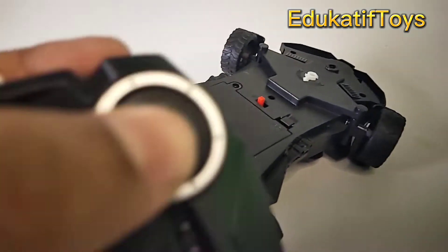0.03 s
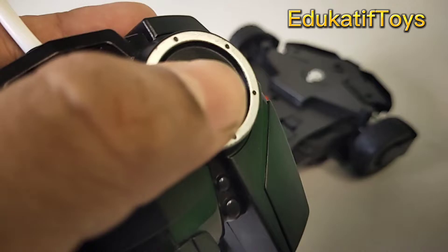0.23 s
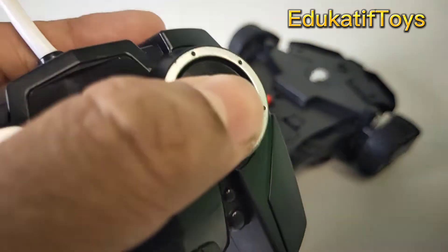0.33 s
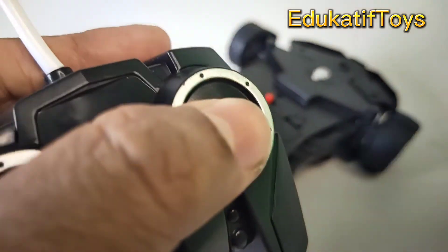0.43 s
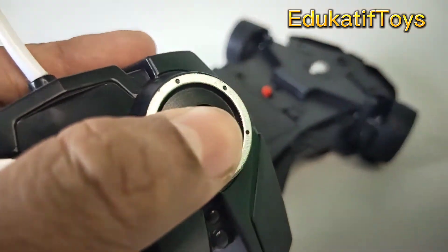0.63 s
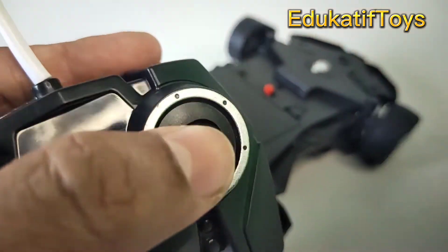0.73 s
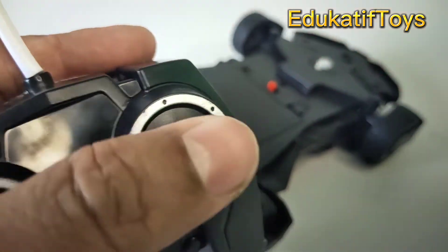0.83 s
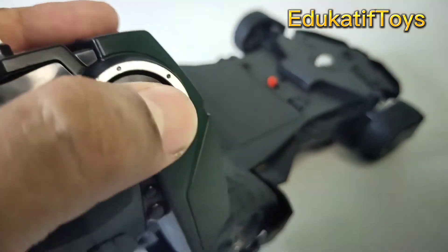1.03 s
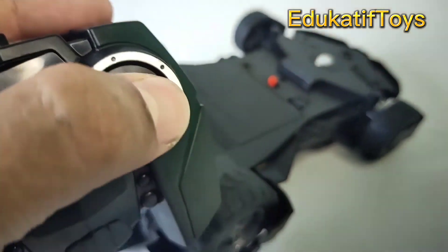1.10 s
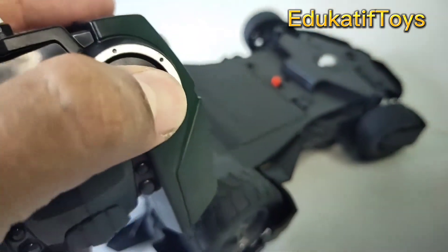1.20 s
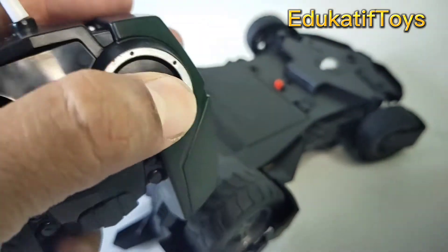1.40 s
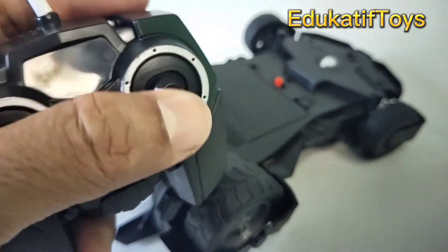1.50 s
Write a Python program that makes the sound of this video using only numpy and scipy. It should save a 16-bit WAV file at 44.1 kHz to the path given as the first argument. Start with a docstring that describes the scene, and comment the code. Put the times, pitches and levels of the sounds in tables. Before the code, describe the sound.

A toy remote's plastic stick clicks sharply twice under a thumb, with faint scrapes around the clicks and soft hollow knocks at the start and end. It is heard close up in a small, quiet room.

```python
"""Thumb on a toy remote

A thumb works the small stick of a plastic toy remote, close up. The stick knocks on the hollow
shell, snaps its switch over twice and scrapes in its socket in between. A small hard room answers
each click, over a low rumble that swells with the handling."""
import sys
import numpy as np
from scipy import signal
from scipy.fft import rfft, irfft, next_fast_len
from scipy.io import wavfile
from scipy.ndimage import map_coordinates

SR = 44100
rng = np.random.default_rng(int(sys.argv[2]) if len(sys.argv) > 2 else 0)


def bounce(signal):
    """Save signal as a 16-bit WAV file at the path given by the first command-line argument."""
    frames = np.transpose(np.atleast_2d(signal))
    limited = np.clip(frames, -1, 1)
    pcm = np.round(limited * 32767).astype(np.int16)
    wavfile.write(sys.argv[1], SR, pcm)


N = 68355


def amp(db):
    """Decibels to gain."""
    return 10 ** (np.asarray(db) / 20)


def unit(x):
    """Scale to rms 1."""
    return x / np.sqrt(np.mean(x ** 2) + 1e-20)


def decay(t, t60):
    """A fade that falls 60 dB in t60 seconds."""
    return amp(-60 * t / t60)


def curve(points):
    """Join (Hz, value) points into a function of frequency, on a log axis."""
    freqs, values = np.transpose(points)
    return lambda hz: np.interp(np.log(hz + 1), np.log(freqs + 1), values)


def eq(x, gain_db):
    """Filter x by a function from Hz to dB."""
    n = x.shape[-1]
    padded = next_fast_len(n + SR // 10)
    hz = np.fft.rfftfreq(padded, 1 / SR)
    return irfft(rfft(x, padded) * amp(gain_db(hz)), padded)[..., :n]


def widen(pair, width):
    """Spread two unrelated signals as mid and side; width 0 is mono."""
    mid, side = pair[0], width * pair[1]
    return np.array([mid + side, mid - side]) / np.sqrt(1 + width ** 2)


def noise(spectrum, size, width):
    """Coloured stereo noise of rms 1."""
    return unit(widen(eq(rng.standard_normal((2, size)), curve(spectrum)), width))


def place(track, start_s, sound):
    """Mix a sound into the track."""
    start = round(start_s * SR)
    sound = sound[:, :N - start]
    track[:, start:start + sound.shape[1]] += sound


# Tone of the still air. Each row: frequency in Hz, level in dB.
AIR_SPECTRUM = [(30, -7), (150, -29), (500, -2.5), (900, -14), (2000, -11), (2850, -12), (3600, -22.5),
                (7000, -28.5), (15000, -36)]

def room_air():
    """The air of the room: a faint, wide, steady bed."""
    return amp(-74) * noise(AIR_SPECTRUM, N, width=0.89)


# Fader ride of the handling. Each row: time in seconds, level in dB.
HANDLING_SWELL = [(0.0, -50), (0.09, -66), (0.254, -47), (0.43, -54.5), (0.452, -48.5), (0.686, -58),
                  (0.764, -46), (0.79, -51.5), (0.928, -50.5), (0.948, -54.5), (0.992, -69), (1.048, -51.5),
                  (1.148, -57), (1.19, -48.5), (1.364, -61.5), (1.424, -60), (1.48, -69), (1.55, -54)]
# Tone of the rumble. Each row: frequency in Hz, level in dB.
RUMBLE_SPECTRUM = [(20, -55), (45, -24.5), (60, -18.5), (75, 0), (100, -4), (130, -1), (153, -3.5),
                   (176, -0.5), (215, -10), (300, -10), (500, -23.5), (1000, -37), (3000, -69)]
# Low hum inside the rumble. Each row: pitch in Hz, relative level in dB.
HUM_TONES = [(129.5, -4.5), (176, -9)]

def handling_rumble(drift_hz=7.7, drift_s=0.07):
    """Low noise and a wavering hum swell with the handling, the hum a little less."""
    t = np.arange(N) / SR
    swell_db = np.interp(t, *np.transpose(HANDLING_SWELL))
    hum_db = swell_db.mean() + 0.92 * (swell_db - swell_db.mean())
    hum = 0
    for hz, db in HUM_TONES:
        drift = map_coordinates(rng.standard_normal(64), [t / drift_s], mode="mirror")
        phase = 2 * np.pi * np.cumsum(hz + drift_hz * drift) / SR
        hum += np.sqrt(2) * amp(db + hum_db) * np.sin(phase)
    return hum + amp(swell_db - 3.5) * noise(RUMBLE_SPECTRUM, N, width=0.16)


# Decay of the room. Each row: frequency in Hz, time to fall 60 dB in seconds.
REVERB_T60 = [(150, 0.98), (800, 0.24), (3000, 0.25), (8000, 0.31), (15000, 0.34)]
# Tone of the reverb. Each row: frequency in Hz, gain in dB.
REVERB_EQ = [(100, -5), (500, 4.5), (1500, 1.5), (2700, 3.5), (4000, -2.5), (6000, -2.5), (9000, -3),
             (15000, -3)]

def reverb(send, return_db=-5, near_db=-7, wall_delay_s=0.0081):
    """A small hard room answers: faint near surfaces first, then the walls."""
    hz, t, bands = signal.stft(rng.standard_normal((2, SR // 2)), SR, nperseg=256)
    bands = bands * decay(t, curve(REVERB_T60)(hz)[:, None])
    tail = signal.istft(bands, SR, nperseg=256)[1]
    age = np.arange(tail.shape[1]) / SR
    tail = widen(tail, 0.49) * amp(near_db / (1 + (age / wall_delay_s) ** 20))
    tail = eq(tail / np.linalg.norm(tail[0]), curve(REVERB_EQ))
    return amp(return_db) * signal.fftconvolve(send, tail, axes=1)


# Stereo lean of the direct sound. Each row: frequency in Hz, left over right in dB.
DIRECT_BALANCE = [(500, -4.5), (1200, -1.5), (2100, 1), (3200, 5), (6000, 4.5), (9000, -6.5), (14000, -2.5)]

def in_room(direct, send):
    """The direct sound at left and right, plus the room's answer to the send."""
    mix = reverb(send)
    balance_db = curve(DIRECT_BALANCE)
    mix[:, :direct.shape[1]] += eq(direct, lambda hz: balance_db(hz) * np.array([[0.5], [-0.5]]))
    return mix


def shelves(body_db, treble_db, body_hz=1900, treble_hz=6500):
    """The EQ curve of one contact: a low shelf for body, a high shelf for treble."""
    return lambda hz: (body_db / (1 + (hz / body_hz) ** 4)
                       + treble_db * (1 - 1 / (1 + (hz / treble_hz) ** 6)))


# Tone of rubbing plastic. Each row: frequency in Hz, level in dB.
SCRAPE_SPECTRUM = [(100, -16), (300, -8), (600, -5), (880, 2.5), (1100, -6), (1500, 2.5), (2200, 1),
                   (3500, 0), (5500, -8), (7000, -17), (9500, -13.5), (11500, -26.5), (15000, -33.5)]
# Scrape cues. Each row: start in seconds, length before the fade in seconds, level in dB,
# body in dB, treble in dB.
SCRAPE_CUES = [(0.187, 0.0091, -47.5, 6.5, -3), (.199, 0.015, -48, 6, -2), (0.2238, 0.0016, -47, 15, 30),
               (0.227, 0.023, -43, -3.5, 2), (0.2365, 0.0027, -31, 5.5, -13.5),
               (0.248, 0.063, -47, -9, -0.5), (0.275, 0.0041, -53, -15, 23),
               (0.291, 0.014, -51.5, 4.5, -13), (0.423, 0.015, -42.5, -2.5, -6),
               (0.442, 0.012, -44, 4.5, 0), (0.46, 0.035, -56, 4, 3.5), (0.705, 0.0023, -43.5, -14, -3),
               (0.7178, 0.016, -43.5, -2, -1.5), (0.741, 0.035, -55, 13, 4),
               (0.771, 0.01, -33.5, -4.5, 4.5), (0.781, 0.02, -38.5, 2.5, -7),
               (0.796, 0.068, -50.5, -6.5, 6), (0.841, 0.0031, -41.5, 2.5, -1), (0.8696, 0.0037, -36, 0, 5),
               (0.9277, 0.0027, -34, -6.5, -3), (0.936, .006, -45, -26, -4), (1.143, 0.0057, -46, -5, -5.5),
               (1.148, 0.0063, -39, -0.5, -0.5), (1.159, 0.039, -54.5, 4.5, 6),
               (1.194, 0.0093, -38.5, 3.5, -8), (1.212, 0.016, -51.5, 3, 1), (1.501, 0.014, -40, -2, -4.5),
               (1.535, 0.0082, -47, 0, 12), (1.545, .007, -37, -11, -0.5)]

def socket_scrapes(slips_per_s=1200, slip_spread_db=3, rise_s=0.0034, release_t60_s=0.025):
    """The stick slips in its socket, plastic on plastic: tiny catches over a smooth rub."""
    track = np.zeros((2, N))
    t = np.arange(SR // 10) / SR
    for start_s, length_s, db, body_db, treble_db in SCRAPE_CUES:
        catches = rng.random(len(t)) < slips_per_s / SR
        strength = amp(slip_spread_db * rng.standard_normal(len(t)))
        slips = catches * strength * rng.choice([-1, 1], (2, len(t)))
        rub = 0.6 * rng.standard_normal(slips.shape)
        friction = widen(unit(slips) + rub, width=0.82)
        grain = unit(eq(friction, curve(SCRAPE_SPECTRUM)))
        stroke = np.minimum(t / rise_s, 1) * decay(np.maximum(t - length_s, 0), release_t60_s)
        scrape = amp(db) * stroke * eq(grain, shelves(body_db, treble_db))
        place(track, start_s, in_room(scrape, scrape))
    return track


def ring_modes(t, modes, colour, scatter_db=1.6, scatter_rad=1, stereo_rad=0.83):
    """Struck plastic rings in fast-dying modes whose level and phase vary from blow to blow."""
    hz, mode_db, t60 = np.transpose(modes)[:, :, None]
    stereo_phase = np.array([1, -1])[:, None, None] * stereo_rad * rng.choice([-1, 1], hz.shape)
    alternating_phase = np.pi * np.arange(len(hz))[:, None]
    phase = alternating_phase + scatter_rad * rng.standard_normal(hz.shape) + stereo_phase
    gain = amp(mode_db + colour(hz) + scatter_db * rng.standard_normal(hz.shape))
    return (gain * decay(t, t60) * np.sin(2 * np.pi * hz * t + phase)).sum(axis=1)


# Tone of a click's noisy crack. Each row: frequency in Hz, level in dB.
CRACK_SPECTRUM = [(30, -41), (150, -13), (400, -15), (800, -10.5), (1300, -1), (1700, -9), (2600, 5),
                  (3500, 1), (5000, -4.5), (7000, -18), (8500, -14.5), (11000, -25), (15000, -32)]
# Ring thrown sideways into the room. Each row: frequency in Hz, send gain in dB.
RING_SEND_EQ = [(400, 0.5), (1200, -2.5), (2100, -5), (2600, 9.5), (3500, -9.5), (6000, -7), (9000, -3),
                (15000, -3.5)]
ATTACK_S, CRACK_T60_S, LEAD_IN_S = 0.0011, 0.016, 0.0044
CRACK_DB, CRACK_SEND_DB, LEAD_IN_DB = -8, -3, -19

def click(modes, start_s, db, body_db, treble_db, pan_db):
    """One blow: a faint noise swells just before the crack and short ring."""
    t = np.arange(SR // 20) / SR
    colour = shelves(body_db, treble_db)

    def grit():
        return eq(noise(CRACK_SPECTRUM, len(t), width=1), colour)

    attack = 1 - np.exp(-(t / ATTACK_S) ** 2)
    ring = attack * ring_modes(t, modes, colour)
    burst = attack * decay(t, CRACK_T60_S)
    pan = amp([[pan_db / 2], [-pan_db / 2]])
    direct = (ring + amp(CRACK_DB) * burst * grit()) * pan
    send = eq(ring, curve(RING_SEND_EQ)) + amp(CRACK_SEND_DB) * burst * grit()
    lead_in = (t / LEAD_IN_S) ** 2 * (t < LEAD_IN_S + ATTACK_S / 2)
    track = np.zeros((2, N))
    place(track, start_s, in_room(direct, send))
    place(track, start_s - LEAD_IN_S, amp(CRACK_DB + LEAD_IN_DB) * lead_in * grit())
    return amp(db) * track


# Ring of the shell. Each row: frequency in Hz, level in dB, time to fall 60 dB in seconds.
SHELL_MODES = [(420, -23, .016), (693, -15.5, 0.02), (1115, -3, 0.013), (1350, -11, 0.018),
               (2065, -10.5, 0.024), (2550, -13, 0.0063), (3544, -5, .013), (3850, -13.5, 0.018),
               (4520, -21, 0.021), (6100, -18.5, 0.0079), (8000, -29, .012)]
# Knock cues. Each row: start in seconds, level in dB, body in dB, treble in dB, leftward pan in dB.
KNOCK_CUES = [(.1080, -25, 6, -1, -0.5), (0.6856, -31, 9.5, 0, 0.5), (1.4855, -22, -0.5, 5, 0.5),
              (1.4921, -24, -18, 1.5, 6)]

def shell_knocks():
    """The stick bumps the hollow shell, which gives a dull knock."""
    return sum(click(SHELL_MODES, *cue) for cue in KNOCK_CUES)


# Ring of the switch. Each row: frequency in Hz, level going in and level coming out in dB,
# time to fall 60 dB in seconds.
SWITCH_MODES = [(1050, -18, -15, .014), (1370, -13.5, -17, .016), (2088, -3.5, -38, .016),
                (2530, -14.5, -6.5, 0.01), (3138, 1, -6, 0.0089), (3560, -3.5, 1.5, 0.0096),
                (4110, -4.5, -1, 0.0096), (4800, -14.5, -14, .011), (6050, -5, -23, 0.0078),
                (8285, -20, -17.5, .009), (9110, -19, -20.5, 0.012), (11220, -31, -28.5, 0.014),
                (13400, -24, -16.5, .008), (14770, -27, -24, .008)]
# Snap cues. Each row: start in seconds, level in dB, body in dB, treble in dB, leftward pan in dB.
SNAP_CUES = [(0.3295, -6.5, -4, 3.5, 5.5), (0.9927, -8, -5.5, 1.5, -2.5)]

def switch_snaps():
    """The switch snaps in, then back out; each direction strikes its modes differently."""
    hz, in_db, out_db, t60 = np.transpose(SWITCH_MODES)
    snap_in = click(np.transpose([hz, in_db, t60]), *SNAP_CUES[0])
    snap_out = click(np.transpose([hz, out_db, t60]), *SNAP_CUES[1])
    return snap_in + snap_out


def scene(bass_mono_hz=350):
    """The remote over rumble and air; its bass is centred, as long waves reach both sides alike."""
    left, right = shell_knocks() + switch_snaps() + socket_scrapes()
    mid = (left + right) / 2
    side = eq((left - right) / 2, lambda hz: -10 * np.log10(1 + (bass_mono_hz / (hz + 1)) ** 2))
    return np.array([mid + side, mid - side]) + handling_rumble() + room_air()


def record(dry):
    """A steep high cut takes the very top off the mix."""
    top_hz, slope_width_hz = 15300, 2000
    return eq(dry, lambda hz: -100 * np.clip((hz - top_hz) / slope_width_hz, 0, 1))


dry = scene()
out = record(dry)
bounce(out)
```